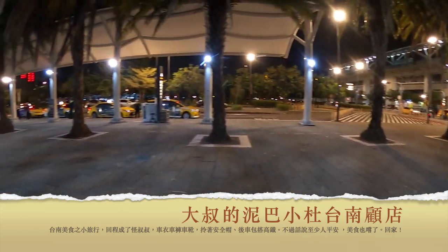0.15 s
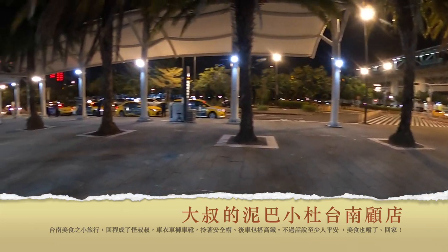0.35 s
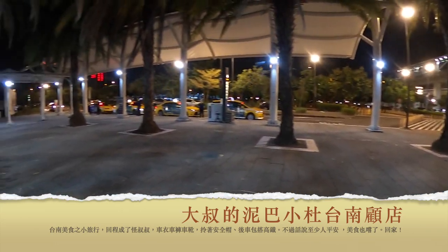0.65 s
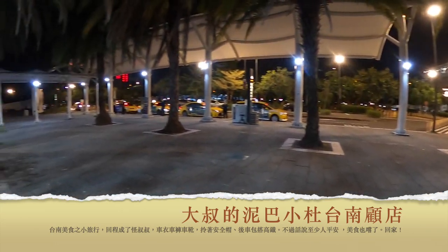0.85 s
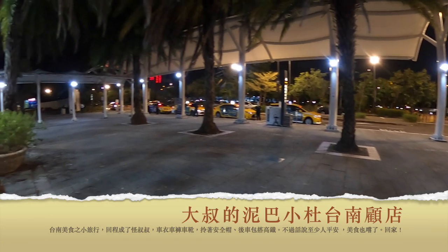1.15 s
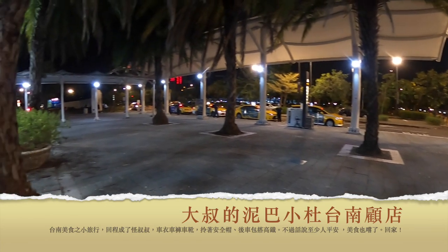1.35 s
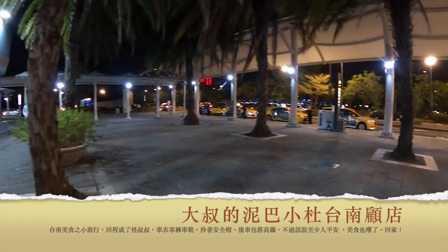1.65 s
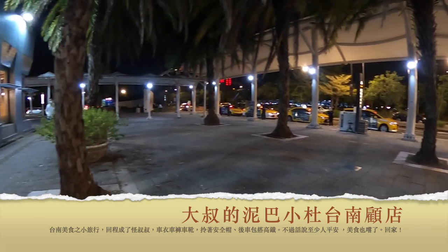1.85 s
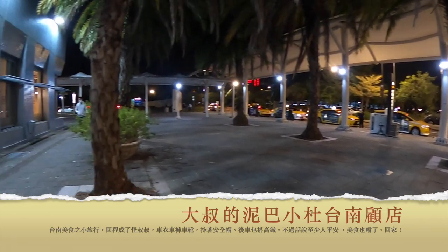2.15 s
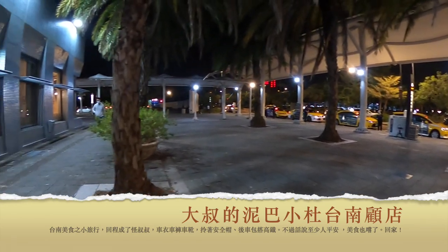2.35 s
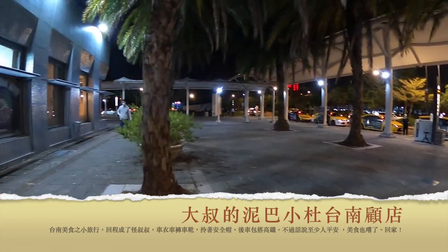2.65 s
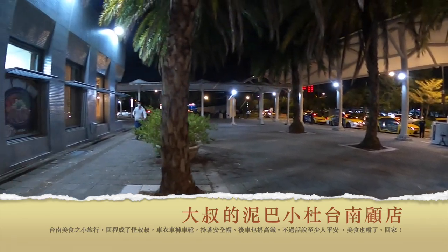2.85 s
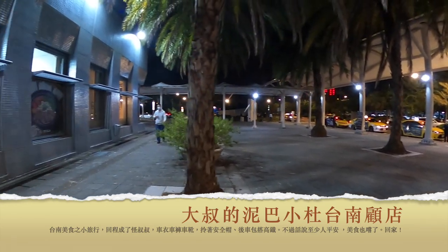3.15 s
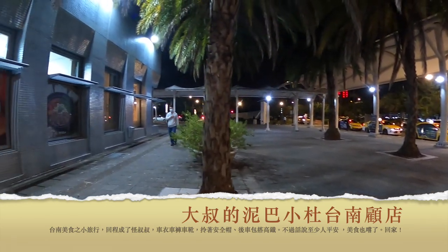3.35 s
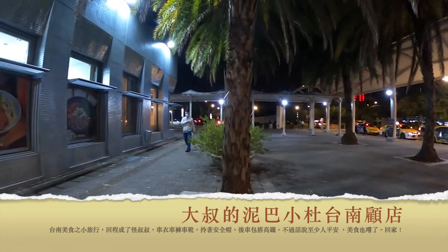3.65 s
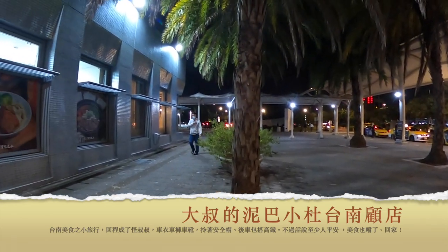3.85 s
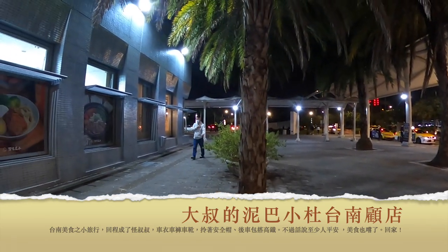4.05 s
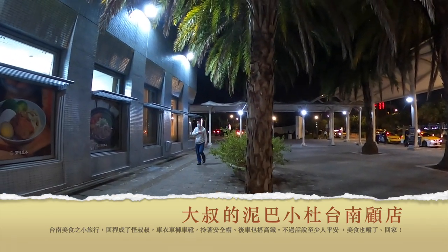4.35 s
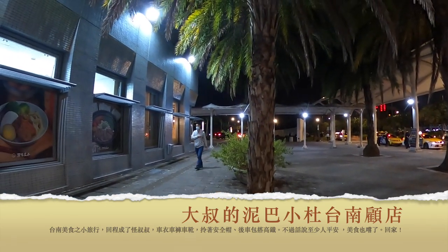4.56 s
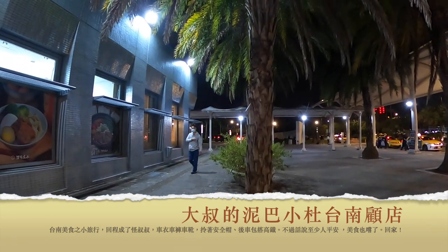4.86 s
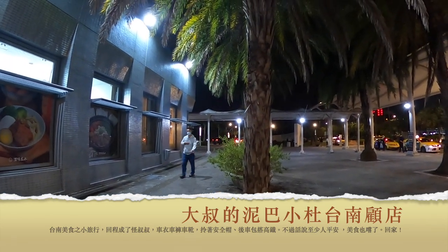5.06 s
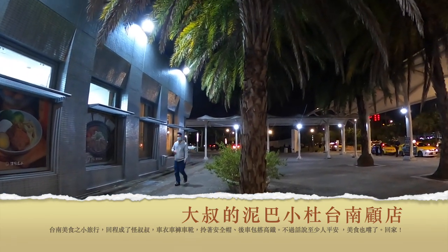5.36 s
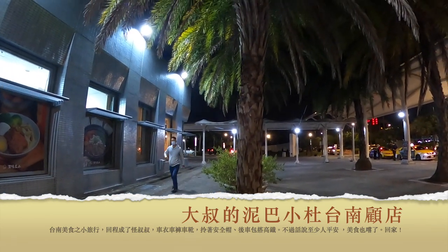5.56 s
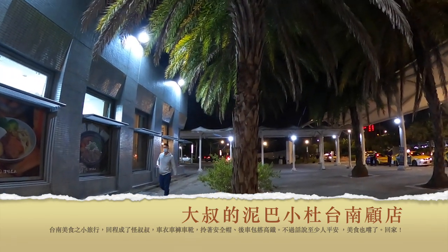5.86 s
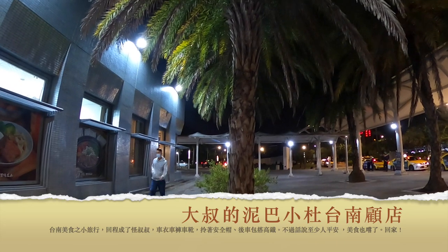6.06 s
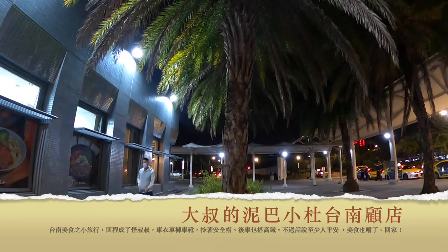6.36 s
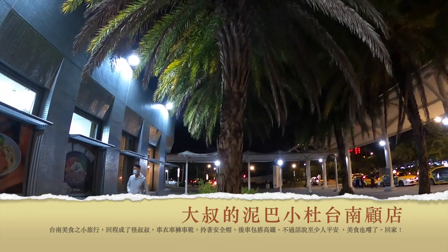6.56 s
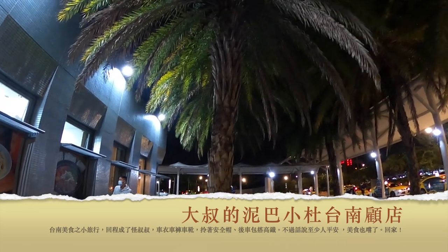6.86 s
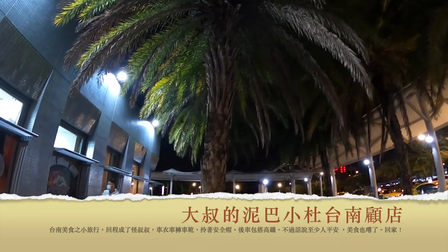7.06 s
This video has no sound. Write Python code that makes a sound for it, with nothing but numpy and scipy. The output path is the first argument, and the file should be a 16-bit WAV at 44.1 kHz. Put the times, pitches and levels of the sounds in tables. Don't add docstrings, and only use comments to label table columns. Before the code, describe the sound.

A night street heard from a paved square through a small widened stereo camera. Deep distant traffic rumble runs throughout, rising slightly, with small heavy-wheel jolts. From 0 s a diesel bus is faint to the right: throbbing exhaust boom, wavering fan drone and a thin high gear whine. Soft low wind puffs bump the microphone around 1.6 to 1.9 s and at 2.8 s. The bus swells from about 2.2 s, its tyres roaring and hissing brightly, and is loudest from 2.8 to 4.1 s, passing closest near 3.5 s as its pitch slides down. A post briefly dulls it near 4 s; by 4.65 s it has dropped behind a corner to the left, its whine fading after 5.9 s. Car tyre roar takes over, one car crossing left to right near 5.4 s. Low exhaust surges push at 6.2 and 6.4 s, and another car grows nearer until the end at 7 s.

```python
import sys
import numpy as np
from scipy import signal
from scipy.io import wavfile
from scipy.ndimage import uniform_filter1d

SR = 44100
rng = np.random.default_rng(int(sys.argv[2]) if len(sys.argv) > 2 else 0)


def volts(x):
    e = np.asarray(x, float) / 20
    return 10 ** e


def store_pcm(level_fs):
    pcm = np.round(np.clip(level_fs, -1, 1) * 32767).astype(np.int16)
    wavfile.write(sys.argv[1], SR, np.atleast_2d(pcm).T)


N = 317520
T = np.arange(N) / SR
HZ = np.fft.rfftfreq(2048, 1 / SR)
FRAME_S = np.arange(N // 512 + 2) * 512 / SR


def read(points, at, log=False):
    x, *columns = np.transpose(points)
    if log:
        at, x = np.log(at + 1), np.log(x + 1)
    return [np.interp(at, x, column) for column in columns]


def bumps(rows, t):
    return sum(db * np.exp(-((t - s) / span) ** 2) for s, db, span in rows)


def together(*levels_db):
    return 10 * np.log10(sum(volts(db) ** 2 for db in levels_db))


def across(t, closest_s, span_s):
    return (t - closest_s) / np.hypot(t - closest_s, span_s)


def spectra(x):
    return signal.stft(x, nperseg=2048, noverlap=1536)[2][..., :len(FRAME_S)]


def noise(shape_db, level_db, lo_hz, hi_hz, patchy_db):
    z = spectra(rng.standard_normal((3, N + 1024)))
    patches = uniform_filter1d(rng.standard_normal(z.shape[1:]), size=20, axis=0)
    patches = uniform_filter1d(patches, size=6, axis=1)
    gain = volts(shape_db * np.ones(z.shape[1:]))
    inside = ((HZ > lo_hz) & (HZ < hi_hz))[:, None]
    band_rms = np.sqrt(np.mean(gain ** 2 * inside, axis=0))
    return z * gain / band_rms * volts(level_db + patchy_db * patches / patches.std())


def tones(crank_hz, orders, level_db, fading, fade_hz):
    t = T[::4]
    turns = np.cumsum(crank_hz)[::4] / SR
    out = np.zeros((3, len(t)))
    for multiple, db in orders:
        for path in out:
            drift = [np.interp(t * fade_hz, np.arange(400), k) for k in rng.standard_normal((2, 400))]
            angle = 2 * np.pi * (multiple * turns + rng.random())
            in_step = (1 + fading * drift[0]) * np.cos(angle)
            path += volts(db) * (in_step + fading * drift[1] * np.sin(angle))
    full_rate = signal.resample_poly(out, 4, 1, axis=1) * volts(level_db + 2)
    return spectra(np.pad(full_rate, ((0, 0), (0, 1024))))


# [f/Hz, gain/dB, phase/rad, left-right balance/dB, share the camera body leaves direct/1]
WIDENING = [(25, 26, 1.9, 1, 0.49), (60, 27.5, 0.11, 3, 1), (130, 29, 2.1, 1, 0.98),
            (248, 26, 1.3, 3, 0.83), (496, 22, 1.2, 0.8, 1), (1000, 15.5, 0.5, 1.1, 0.89),
            (1830, 12, -0.015, 1.5, 0.94), (2920, 9, 0.79, -0.9, 0.96), (4500, 4, 0.49, -0.5, 0.44),
            (6700, 1.5, 0.83, 1.2, 0.58), (8600, 4, -0.76, 2.5, 0.11), (11700, -0.5, -2.2, -3, 0.15),
            (12800, 3, -2.7, 10, 0.24), (15500, 6, -1.5, -12, 0.42)]
PORT_GAP_S = 85e-6


def ports(z, lead_us, direct, twist):
    gain_db, phase, balance_db, unshaded = (c[:, None] for c in read(WIDENING, HZ, True))
    half_turn = np.pi * HZ[:, None] * lead_us * 1e-6
    direct = np.clip(direct * unshaded, 0, 1)
    scattered = 1 - direct
    alike = np.sinc(2 * HZ * PORT_GAP_S)[:, None]
    mid = np.sqrt(direct) * np.cos(half_turn) * z[0] + np.sqrt(scattered * (1 + alike) / 2) * z[1]
    side = np.sqrt(direct) * np.sin(half_turn) * z[0] + np.sqrt(scattered * (1 - alike) / 2) * z[2]
    side = side * volts(gain_db) * np.exp(1j * (phase + twist))
    return np.array([(mid + side) * volts(balance_db / 2), (mid - side) * volts(-balance_db / 2)])


# [f/Hz, level/dB per Hz]
RUMBLE_COLOUR = [(8.8, -25), (15, -8), (53, 2), (91, -2.5), (130, -3), (163, -5), (205, -9), (230, -6),
                 (300, -31.5), (510, -120)]
# [t/s, change/dB, half length/s]
JOLTS = [(1.56, 4, 0.027), (1.92, 2, 0.057), (2.73, 6, .04), (3.89, 3.5, 0.094), (4.09, -3.5, 0.031),
         (4.23, 1, .06), (4.43, -3.5, .06), (5.35, 0, 0.12), (6.0, -4, 0.097), (6.3, -5.5, 0.085),
         (6.82, 1.5, 0.13)]


def far_rumble():
    level_db = -29 + 0.4 * FRAME_S + bumps(JOLTS, FRAME_S)
    return ports(noise(read(RUMBLE_COLOUR, HZ, True)[0][:, None], level_db, 25, 110, 0.31), -25, 0.54, .1)


# [f/Hz, level/dB per Hz]
CAPSULE_COLOUR = [(3000, -27), (7000, 2.5), (9500, -14), (12000, -19.5), (14000, -7), (15800, -7)]


def capsule_hiss():
    return noise(read(CAPSULE_COLOUR, HZ, True)[0][:, None], -72, 9000, 15000, .5)[:2]


def breeze():
    return noise(-20 * np.log10(1 + (HZ[:, None] / 45) ** 2), -43, 15, 90, 2.4)[:2]


# [t/s, nearness/dB, extra treble in clear view/dB]
BUS_PASS = [(0, -18, -0.5), (1.06, -14, 0.5), (1.5, -11, -1), (1.86, -10.5, 4.5), (2.2, -8.5, 3.5),
            (2.8, -1, 1.5), (3.5, 0, 0.5), (4.15, 0, -1.5), (4.53, -3.5, -1), (4.65, -8.5, -1),
            (5.3, -13, 3.5), (6, -16, 2), (7.2, -14, 0.5)]
# [t/s, change/dB, half length/s]
SHADES = [
    (3.99, -4.5, 0.11),
    (5.59, 2, 0.019),
    (6.17, -0.5, 0.12),
]
PASS_S, PASS_SPAN_S, CAMERA_TURN_US = 3.45, 0.79, -8
CORNER_S, CORNER_SPAN_S = 4.42, 0.23


def bus_path(t):
    hidden = np.clip((t - CORNER_S) / CORNER_SPAN_S, 0, 1)
    near_db = read(BUS_PASS, t)[0] + bumps(SHADES, t) * (1 - hidden)
    lead_us = 76 * across(t, PASS_S, PASS_SPAN_S) + CAMERA_TURN_US
    return near_db, lead_us, .8 - 0.46 * hidden, hidden


# [t/s, change/dB, half length/s]
THROBS = [(.24, -1.5, 0.072), (.68, -6.5, 0.1), (2.53, 1, 0.074), (2.77, -6, 0.083), (2.94, 5.5, 0.045),
          (3.15, -5, 0.3), (3.53, 3.5, 0.031), (3.77, -6, 0.037), (3.89, 4.5, .06), (4.01, -1, 0.051),
          (4.15, 2, 0.28), (5.23, 2, 0.045), (5.47, 5, 0.067)]
# [multiple of crank speed/1, level under the boom/dB]
FIRING = [(8.07, -5), (8.3, -9), (8.7, -9), (7.5, -10)]


def tail_pipe(crank_hz, near_db):
    boom_db = np.interp(T, FRAME_S, bumps(THROBS, FRAME_S))
    boom_db = boom_db + together(-22.5 + 1.5 * near_db, -36 + 0.36 * T)
    pipe_hz = 8.03 * np.interp(FRAME_S, T, crank_hz)
    pipe_db = -20 * np.log10(1 + ((HZ[:, None] - pipe_hz) / 32) ** 2)
    boom = noise(pipe_db, np.interp(FRAME_S, T, boom_db) - 6, 220, 310, 1.5)
    return boom + tones(crank_hz, FIRING, boom_db, .5, 7)


# [multiple of blade rate/1, level re fan tone/dB]
FAN_TONES = [(1, 2), (2, -37.5), (3, -15), (4, -17), (5, -18.5), (6, -28), (7, -13)]
# [t/s, change/dB, half length/s]
FAN_SWELLS = [(.36, 6.5, 0.14), (.9, 3, 0.24), (1.82, 6.5, 0.17), (2.6, 9, 0.28), (2.97, 4, 0.036),
              (3.53, 4, 0.074), (3.77, 7.5, 0.03), (4.08, 3.5, .12), (4.35, -4, .06), (4.53, 12.5, 0.073),
              (4.68, -21, 0.13), (5.13, 4, 0.063), (5.47, -7, 0.066), (5.75, 4, 0.14), (6.55, 2, 0.31)]


def cooling_fan(crank_hz, near_db):
    level_db = np.interp(T, FRAME_S, bumps(FAN_SWELLS, FRAME_S)) - 35.5 + 0.21 * near_db
    slowing = 1 - 0.044 * np.clip(T - CORNER_S, 0, 1)
    return tones(crank_hz * 4.157 * slowing, FAN_TONES, level_db, 0.2, 3.0)


# [multiple of crank speed/1, level re the block's overall level/dB]
CRANK_ORDERS = [(6, -12), (10, -12), (12, -6), (13, -16), (18, -16), (22, -18), (24, -16), (27, -13),
                (28, -13), (30, -16), (31, -18)]


def engine_block(crank_hz, near_db):
    return tones(crank_hz, CRANK_ORDERS, -27.0 + 0.9 * near_db, 0.71, 7)


TEETH = 78
# [t/s, change/dB, half length/s]
GLINTS = [(.85, -3, 0.096), (1.3, 2, 0.2), (2.2, 7.5, 0.16), (2.37, -7, 0.067), (2.5, 7, 0.037),
          (2.75, -4.5, 0.26), (3.3, 1.5, 0.087), (3.55, 1.5, .05), (4.07, 8, 0.052), (4.3, 1, 0.21),
          (4.9, -0.5, 0.24), (5.25, 2, 0.052), (5.8, 5, .13)]


def gear_whine(crank_hz, near_db):
    level_db = np.interp(T, FRAME_S, bumps(GLINTS, FRAME_S)) - 35 + 1.43 * near_db
    level_db = level_db - 12 * np.maximum(T - 5.9, 0)
    mesh = [(TEETH, -2), (TEETH + .6, -9), (TEETH + 2, -13), (TEETH - 1.5, -14)]
    return tones(crank_hz, mesh, level_db, 1.3, 34)


# [t/s, f/Hz]
MESH_PITCH = [(0, 2570), (.5, 2590), (1.2, 2620), (2, 2640), (2.5, 2648), (2.9, 2645), (3.2, 2605),
              (3.5, 2560), (3.8, 2520), (4.1, 2482), (4.5, 2452), (5, 2436), (5.5, 2428), (6, 2422),
              (7.2, 2415)]


def bus():
    crank_hz = uniform_filter1d(read(MESH_PITCH, T)[0], size=9000) / TEETH
    frame_near_db, lead_us, direct, _ = bus_path(FRAME_S)
    near_db = np.interp(T, FRAME_S, frame_near_db)
    machinery = tail_pipe(crank_hz, near_db) + cooling_fan(crank_hz, near_db)
    machinery = machinery + engine_block(crank_hz, near_db) + gear_whine(crank_hz, near_db)
    return ports(machinery, lead_us, direct + 0.18, -0.59)


# [closest t/s, roar level/dB, distance over speed/s, heading (-1 to the right, 1 to the left)]
CROSSINGS = [
    (5.45, -31, 0.42, -1),
    (6.55, -37, 0.89, 1),
    (7.5, -27, 0.3, -1),
]


def passing_cars():
    levels_db, weighted_us = [], 0
    for closest_s, db, span_s, heading in CROSSINGS:
        sine = across(FRAME_S, closest_s, span_s)
        level_db = db + 10 * np.log10(1 - sine ** 2)
        levels_db.append(level_db)
        weighted_us = weighted_us + volts(level_db) ** 2 * 66 * np.sign(heading) * sine
    all_db = together(*levels_db)
    return all_db, weighted_us / volts(all_db) ** 2


# [f/Hz, level/dB per Hz]
BUS_ROAR = [(190, -17), (320, -5.5), (420, -10), (550, -6), (720, -11), (900, -9.5), (1300, -12),
            (1650, -17.5), (2300, -23.5), (2990, -25.5), (5060, -105)]
# [f/Hz, level/dB per Hz]
CAR_ROAR = [(180, -27), (300, 1), (325, -4), (392, -8), (478, -1.5), (565, -4.5), (956, -5.5), (1080, -3.5),
            (1620, -12), (2170, -20), (2470, -20), (2680, -25), (3200, -27), (4160, -33), (7040, -120)]
# [f/Hz, level/dB per Hz]
TREAD_HISS = [(1650, -0.5), (2800, -2), (3710, -5), (3960, -5), (4160, -5.5), (4510, -5.5), (4810, -6.5),
              (5280, -8.5), (8440, -20), (12300, -21.5), (13900, -31), (15000, -25), (15700, -26)]
FAR_TYRES_DB, STREAM_DB = -37, -31.5


def tyres():
    near_db, bus_us, direct, cars = bus_path(FRAME_S)
    bus_share = 1 - cars
    crossing_db, cars_us = passing_cars()
    cars_db = together(STREAM_DB, crossing_db) + bumps(SHADES, FRAME_S)
    lead_us = bus_share * 0.78 * bus_us + cars * cars_us

    roar_db = bus_share * together(FAR_TYRES_DB, -24.5 + near_db) + cars * cars_db
    colour_db = np.outer(read(BUS_ROAR, HZ, True)[0], bus_share)
    colour_db = colour_db + np.outer(read(CAR_ROAR, HZ, True)[0], cars)
    roar = noise(colour_db, roar_db, 400, 2000, 0.38)

    bus_hiss_db = -39 + 0.86 * near_db + read(BUS_PASS, FRAME_S)[1]
    hiss_db = bus_share * bus_hiss_db + cars * together(bus_hiss_db, cars_db - 24)
    bright_db = bus_share * (2.5 + 0.43 * near_db) + cars * (0.5 + .5 * (crossing_db - STREAM_DB))
    octaves = np.log2(np.maximum(HZ / 4500, 1))
    hiss_colour_db = read(TREAD_HISS, HZ, True)[0][:, None] + np.outer(octaves, bright_db)
    hiss = noise(hiss_colour_db, hiss_db + 1.5, 2905, 5700, 0.98)
    return ports(roar, lead_us, direct + 0.046, -0.44) + ports(hiss, lead_us, 1.2 - 0.7 * cars, -0.29)


# [t/s, level/dB, f/Hz, port (0 left, 1 right)]
PUFFS = [
    (1.56, -28, 41, 0),
    (1.62, -27, 35, 1),
    (1.84, -39, 45, 0),
    (1.94, -22, 70.6, 0),
    (2.77, -26, 60, 1),
]


def wind():
    out = np.zeros((2, N))
    for s, db, hz, port in PUFFS:
        u = (T - s) * hz
        out[int(port > .5)] += volts(db + 6) * np.sin(2 * np.pi * u) * np.exp(-2 * u ** 2)
    return out


# [t/s, level/dB, half length/s]
REVS = [
    (3.904, -27, .07),
    (6.163, -17.5, 0.072),
    (6.442, -19, 0.09),
    (6.85, -29, 0.22),
]


def car_drone():
    revs_db = together(-55, *[db - 7.2 * ((FRAME_S - s) / span) ** 2 for s, db, span in REVS])
    colour_db = -20 * np.log10(1 + ((HZ[:, None] - 64) / 14) ** 2)
    return ports(noise(colour_db, revs_db, 40, 95, .5), -25, 0.54, .1)


def scene():
    z = far_rumble() + capsule_hiss() + breeze() + bus() + tyres() + car_drone()
    return signal.istft(z, nperseg=2048, noverlap=1536)[1][:, :N] + wind()


def band_limit(x):
    return signal.sosfilt(signal.butter(12, 15780, fs=SR, output="sos"), x)


def record(dry):
    mix = dry - .0055
    return band_limit(mix)


dry = scene()
out = record(dry)
store_pcm(out)
```